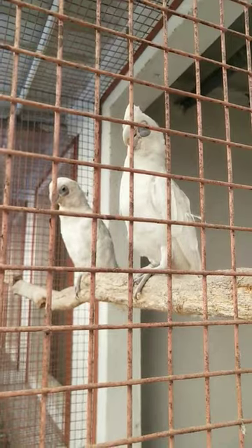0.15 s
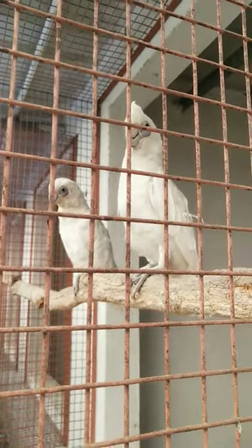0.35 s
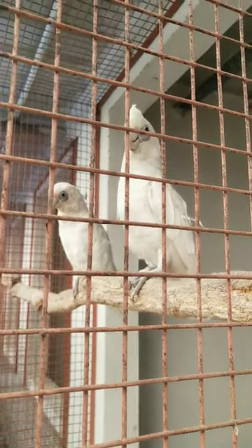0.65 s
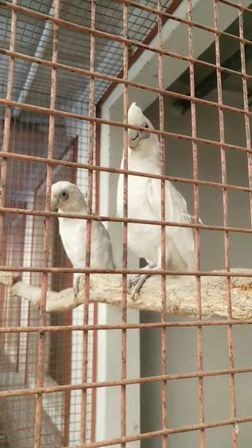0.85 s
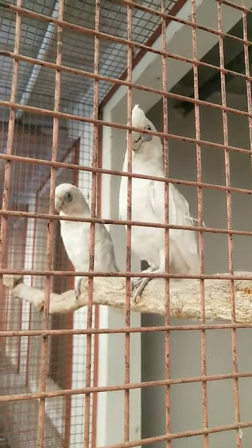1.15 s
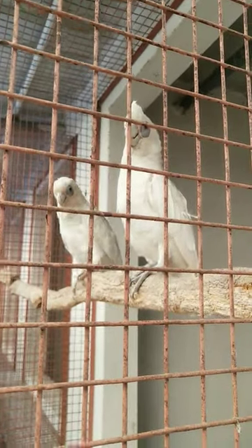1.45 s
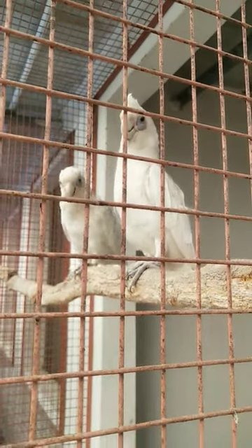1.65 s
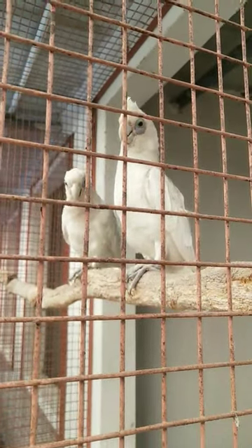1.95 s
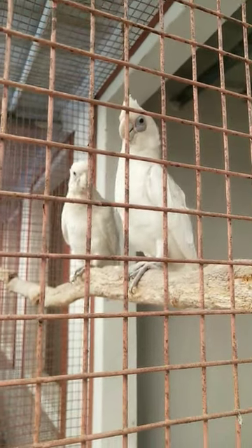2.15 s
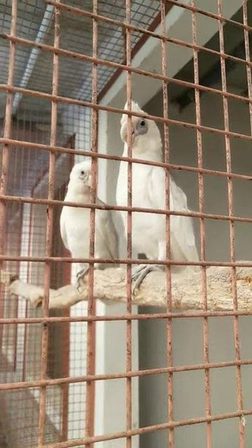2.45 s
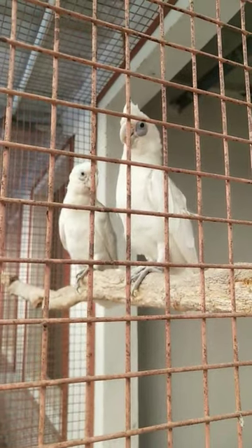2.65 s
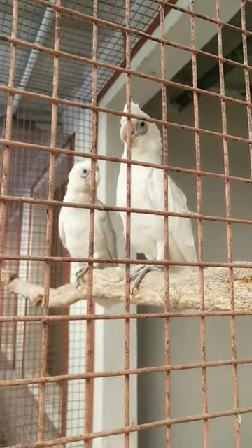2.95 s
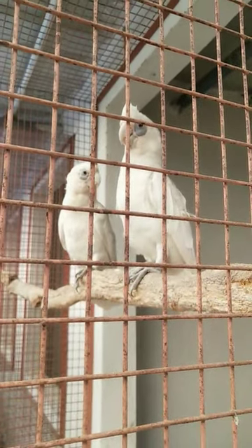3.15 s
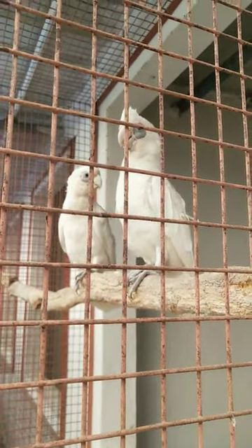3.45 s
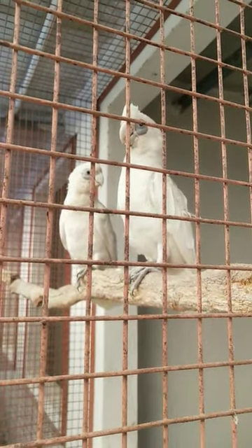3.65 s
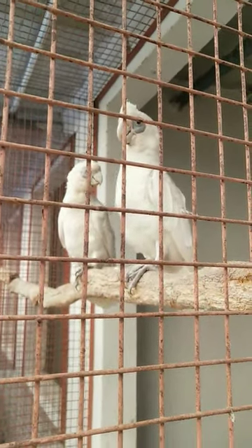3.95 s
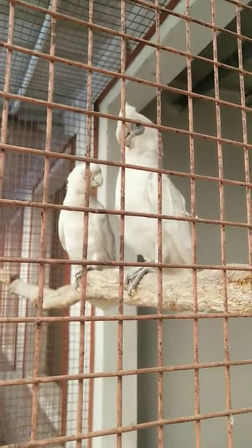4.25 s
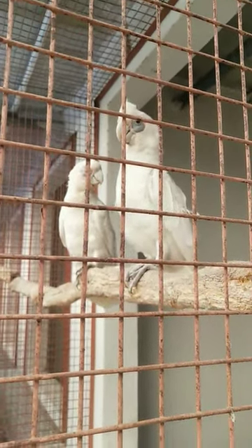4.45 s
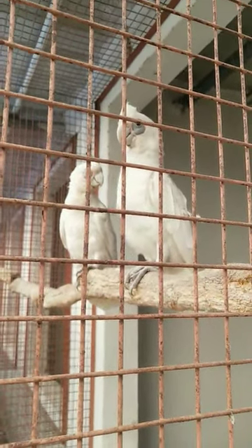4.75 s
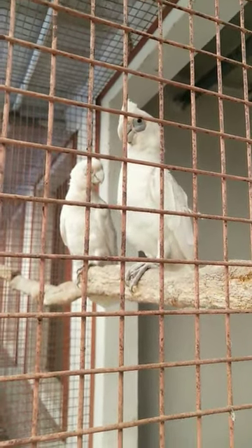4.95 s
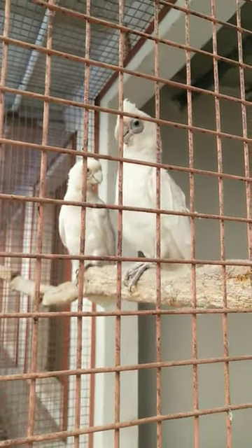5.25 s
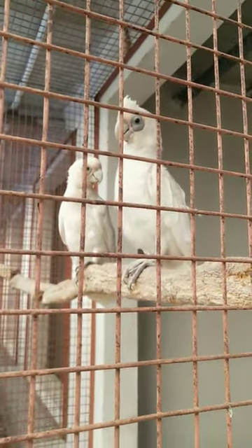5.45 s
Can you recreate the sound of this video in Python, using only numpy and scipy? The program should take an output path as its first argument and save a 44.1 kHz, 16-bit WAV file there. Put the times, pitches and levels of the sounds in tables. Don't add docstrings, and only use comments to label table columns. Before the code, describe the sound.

Parrots call in a hard, echoing aviary. Short rising whistles and harsh, raspy screeches alternate, the loudest screech just before two seconds. After a thinner middle, more whistles, low yelps and a long clear note follow. Small birds twitter high above. A sheet-metal door bangs softly five times with a late boom. Far chatter, rumble and hiss lie behind, heard in stereo by a small microphone, mostly as reverberation.

```python
import sys
import numpy as np
from scipy import signal
from scipy.fft import rfft, irfft, next_fast_len
from scipy.io import wavfile

SR = 44100
rng = np.random.default_rng(int(sys.argv[2]) if len(sys.argv) > 2 else 0)


def output_pcm(signal):
    pcm = np.clip(np.atleast_2d(signal).T, -1, 1) * 32767
    wavfile.write(sys.argv[1], SR, np.round(pcm).astype(np.int16))


def level_to_linear(level):
    exponent = np.asarray(level, float) / 20
    return 10 ** exponent


N = 246519


def at_hz(points, hz):
    table_hz, value = np.transpose(points)
    return np.interp(np.log(hz), np.log(table_hz), value)


def rms_one(x):
    return x / np.sqrt(np.mean(x ** 2) + 1e-20)


def drift(rate_hz):
    pole = np.exp(-2 * np.pi * rate_hz * 20 / SR)
    noise = rng.standard_normal(N // 20 + 2002)
    slow = signal.lfilter([1], [1, -2 * pole, pole * pole], noise)[2000:]
    return np.interp(np.arange(N) / 20, np.arange(len(slow)), rms_one(slow))


# frequency in Hz, left-right likeness from 0 to 1.
PORT_LIKENESS = [(30, 0.65), (130, 1), (290, 0.78), (640, 0.58), (1400, 0.053), (5000, 0.084),
                 (15000, 0.029)]
# frequency in Hz, left minus right in dB.
PORT_LEANING = [(60, 1), (300, 1.5), (600, 0.5), (1500, 5), (2800, 7), (5000, 2), (9000, 16), (14000, 4)]


def stereo_bands(gain, size):
    out = 0
    edges = 25 * 2 ** (np.arange(30) / 3)
    white = rng.standard_normal((2, 2, size))
    left_right = np.array([[1], [-1]])
    for k, (low, high) in enumerate(zip(edges, edges[1:])):
        band = signal.butter(2, [low, high], "band", fs=SR, output="sos")
        mid, side = signal.sosfilt(band, white[k % 2])
        hz = np.sqrt(low * high)
        alike = np.clip(at_hz(PORT_LIKENESS, hz), -1, 1)
        pair = np.sqrt(1 + alike) * mid + np.sqrt(1 - alike) * side * left_right
        out = out + gain(hz) * pair * level_to_linear(at_hz(PORT_LEANING, hz) / 2 * left_right)
    return out


# frequency in Hz, time to fall by 60 dB in seconds.
HALL_T60 = [(60, 2.44), (500, 1.61), (1000, 0.93), (3000, 1.49), (6000, 1.11), (14000, 0.058)]


def hall(x, build_s, early_db, t60_share, colour=lambda hz: 0, damping=0):
    t = np.arange(3 * SR // 2) / SR
    swell = 1 - np.exp(-t / build_s) + level_to_linear(early_db) * np.exp(-t / 0.025)

    def decay(hz):
        t60_s = t60_share * at_hz(HALL_T60, hz) / (1 + damping * hz / 4000)
        return swell * level_to_linear(colour(hz) - 60 * t / t60_s)

    echoes = stereo_bands(decay, size=len(t))
    echoes = echoes / np.sqrt(np.sum(echoes ** 2) / 2)
    size = next_fast_len(N + len(t))
    return irfft(rfft(echoes, size) * rfft(x, size), size)[:, :N]


# start in seconds, level in dB.
CHATTER_LEVEL = [(0, -38), (.3, -40.5), (.7, -39.5), (1.0, -44), (1.399, -36.5), (1.8, -42), (2.2, -38),
                 (2.5, -39), (2.8, -42), (3.2, -45.5), (3.6, -55.5), (3.9, -45), (4.3, -37.5), (5.0, -42.5),
                 (5.59, -36.5)]
# start in seconds, level in dB.
RUMBLE_LEVEL = [(0, -37.5), (.4, -46.5), (1.1, -40), (1.6, -45), (2.7, -48.5), (3.2, -43.5), (3.6, -42.5),
                (4.0, -39.5), (5.0, -45), (5.59, -47.5)]
# frequency in Hz, density in dB per Hz.
BACKGROUND_COLOUR = [(15, -45), (25, -7.5), (136, 3.5), (468, -4), (845, -1.5), (1260, -7.5), (2110, -0.5),
                     (3070, -1.5), (3810, 0), (6180, -3), (8300, -18), (10600, -70), (14200, -34),
                     (15400, -60)]


def chatter():
    t = np.arange(N) / SR
    birds_db = np.interp(t, *np.transpose(CHATTER_LEVEL))
    rumble_db = np.interp(t, *np.transpose(RUMBLE_LEVEL))
    hiss_db = -30.5 + 0.27 * (birds_db - birds_db.mean())
    deep_db = rumble_db.mean() + 0.58 * (rumble_db - rumble_db.mean())
    patchy_db = 0.98 * drift(6.6)

    def gain(hz):
        if hz < 170:
            own_db = deep_db
        elif hz < 1500:
            own_db = rumble_db
        elif hz > 9500:
            own_db = hiss_db
        else:
            own_db = birds_db
        return level_to_linear(at_hz(BACKGROUND_COLOUR, hz) + own_db + patchy_db + 2.3 * drift(18))

    return level_to_linear(3.0) * stereo_bands(gain, size=N)


# start in seconds, level in dB.
TICKS = [
    (2.9, -90),
    (3.117, -63),
    (3.775, -57),
    (4.4, -44),
]


def wire():
    clicks = np.zeros(N)
    for s, level_db in TICKS:
        clicks[round(s * SR)] = level_to_linear(level_db + 29)
    bright = signal.butter(4, 9000, "high", fs=SR, output="sos")
    return signal.sosfilt(bright, clicks + 1e-18)


# start in seconds, level in dB, brightness in dB.
BANGS = [
    (.388, -36.5, -5.5),
    (1.017, -32.5, -8),
    (3.363, -35, -10.5),
    (4.095, -37, -7),
    (4.762, -34.5, -12),
]
# frequency in Hz, density in dB per Hz.
SHEET_COLOUR = [(40, -43), (145, -15.5), (440, -9), (800, -1.5), (1500, -3.5), (2400, -3), (3500, -12.5),
                (7000, -6), (9000, -27), (12000, -16), (15300, -6)]


def door():
    rattle, boom = np.zeros(N), np.zeros(N)
    t = np.arange(SR // 2) / SR
    burst = level_to_linear(-39.0) * rng.standard_normal((len(BANGS), len(t))) * np.exp(-t / 0.025)
    burst[:, 0] = 1
    panel = (1 - np.exp(-t / 0.044)) ** 2 * np.exp(-t / 0.069) * np.sin(2 * np.pi * 152 * t)
    for (s, level_db, bright_db), hit in zip(BANGS, burst):
        dull = signal.lfilter([.3], [1, -.7], hit)
        start = round(s * SR)
        at = slice(start, start + len(t))
        rattle[at] += level_to_linear(level_db + 42) * (dull + level_to_linear(bright_db) * (hit - dull))
        boom[at] += level_to_linear(level_db + 2.5) * panel
    spread = hall(rattle, build_s=0.032, early_db=-12.5, t60_share=1.16, damping=0.66,
                  colour=lambda hz: at_hz(SHEET_COLOUR, hz))
    return spread + boom * level_to_linear([[1.1], [-1.1]])


def coloured(spectrum, level_db):
    hz = np.maximum(np.arange(N // 2 + 1) * SR / N, 1)
    shaped = rfft(rng.standard_normal(N)) * level_to_linear(at_hz(spectrum, hz))
    return level_to_linear(level_db) * rms_one(irfft(shaped, N))


# frequency in Hz, density in dB per Hz.
THROAT_COLOUR = [(1300, -61), (1900, -16.5), (3000, -10), (4300, 8.5), (5000, -20), (6200, -12.5),
                 (8000, -6.5), (8800, -21), (15400, -27)]


def throat_rasp(level_db):
    return coloured(THROAT_COLOUR, level_db)


def breath(level_db):
    # frequency in Hz, density in dB per Hz.
    breathy = [(1500, -41), (2200, -0.5), (3200, 4.5), (3800, -5), (7000, -9.5), (12000, -39)]
    return coloured(breathy, level_db)




def voice(calls, manner, orders, wobble, wobble_hz, sag, flutter_db, rasp):
    t, out = np.arange(N) / SR, np.zeros(N)
    glide_s, swell, swell_db, fade_db, off_db = manner
    unsteady = 1 + wobble * drift(wobble_hz) - sag * np.minimum(drift(wobble_hz / 3) ** 2, 3)
    flutter = level_to_linear(flutter_db * drift(86))
    peak = np.clip(swell, .02, .98)
    for start, length, open_hz, held_hz, level_db in calls:
        on = slice(max(int(start * SR), 0), min(int((start + length) * SR), N))
        done = (t[on] - start) / length
        to_glide = np.maximum(1 - done * length / glide_s, 0)
        hz = held_hz + (open_hz - held_hz) * to_glide ** 2
        phase = 2 * np.pi * np.cumsum(hz * unsteady[on]) / SR
        edge = np.clip(np.minimum(done, 1 - done) * length * 50, 0, 1)
        effort_db = level_db - np.interp(done, [0, peak, 1], [swell_db, 0, fade_db])
        effort_db = effort_db - off_db * np.abs(np.log2(hz / held_hz))
        tone = np.sqrt(2) * sum(level_to_linear(db) * np.sin(k * phase) for k, db in orders)
        air = rasp[on] * (1 + np.cos(phase / 2))
        out[on] += edge * level_to_linear(effort_db) * (tone + air)
    return out * flutter


CHIRPS = [ (-.06, 0.26, 4300, 4160, -39), (-.05, 0.18, 6330, 6220, -43), (.002, .08, 7000, 7140, -41),
          (.272, 0.22, 7170, 6325, -39.5), (1.082, .28, 7200, 7450, -46), (2.552, 0.23, 6330, 6940, -46),
          (2.722, 0.064, 5070, 4250, -38), (2.802, 0.15, 6520, 6850, -41.5), (2.992, .04, 7500, 7550, -50),
          (3.032, .15, 6360, 6140, -44.5), (4.205, 0.13, 6700, 7000, -43), (4.295, 0.28, 4200, 4310, -46),
          (4.375, 0.052, 5660, 6500, -41.5), (4.625, 0.1, 6040, 6750, -46), (4.785, .155, 7570, 6950, -50),
          (5.15, 0.16, 5060, 4930, -38), (5.21, 0.18, 5830, 6840, -38.5), (5.245, 0.23, 4300, 4060, -40),
          (5.405, 0.27, 6620, 6550, -50), (5.475, 0.17, 1226, 1345, -49.5)]
TWITTER_MANNER = (.1, 0.23, 1.7, 8.0, 1.5)


def twitters():
    return voice(CHIRPS, TWITTER_MANNER, [(0.97, 0.016)], wobble=0.03394, wobble_hz=129.0,
                 sag=0.00498, flutter_db=5.5, rasp=throat_rasp(-12.5))


NOTES = [
    (.31, 0.15, 2997, 2965, -39.5),
    (.46, 0.095, 2990, 3063, -40.5),
    (1.46, 0.15, 2882, 2912, -40.5),
    (3.7, 0.036, 3490, 3570, -43),
    (3.93, 0.113, 1964, 1984, -38.5),
    (4.615, .23, 2368, 2360, -30.5),
    (4.92, 0.097, 2360, 2360, -39),
]
NOTE_ORDERS = [(1, 6), (2, -31)]
NOTE_MANNER = (0.084, 0.61, 9.7, 6.8, 3.0)


def clear_notes():
    return voice(NOTES, NOTE_MANNER, NOTE_ORDERS, wobble=0.0068, wobble_hz=41.7,
                 sag=0.00093, flutter_db=3.0, rasp=breath(-43))


YELPS = [
    (2.46, .11, 680, 950, -43),
    (2.495, 0.07, 1706, 1800, -38),
    (3.92, .14, 932, 1235, -39.5),
    (4.07, 0.082, 1528, 1045, -33.5),
    (4.14, .28, 1052, 992, -45.5),
    (4.23, 0.137, 1789, 1752, -40.5),
    (4.535, 0.042, 5260, 5060, -33.5),
]
YELP_ORDERS = [(1, 5), (2, -20)]
YELP_MANNER = (.12, 0.34, 3.3, 4.2, 2.3)


def yelps():
    return voice(YELPS, YELP_MANNER, YELP_ORDERS, wobble=0.0506, wobble_hz=45.0,
                 sag=0.0052, flutter_db=4.5, rasp=breath(-20))


WHISTLES = [ (-.05, 0.43, 3150, 3220, -47.5), (.14, 0.26, 2483, 2756, -42), (.25, 0.21, 2150, 3000, -35),
            (.36, 0.18, 2503, 2610, -37.5), (.44, 0.14, 2700, 3250, -33.5), (1.17, 0.16, 3050, 3090, -46),
            (1.41, 0.17, 2300, 3100, -33.5), (1.89, 0.16, 2890, 3156, -36), (2.22, 0.11, 2450, 3100, -37),
            (2.36, 0.061, 2750, 2680, -34), (3.05, 0.095, 3200, 3200, -49), (3.16, .08, 2900, 3600, -48),
            (3.385, 0.15, 2000, 3250, -32.5), (3.54, 0.088, 2600, 3150, -32),
            (3.66, 0.29, 2600, 2550, -45.5), (3.76, .16, 2500, 3233, -47.5), (4.18, 0.24, 2500, 3040, -34),
            (4.52, .33, 1900, 3330, -30.5), (5.1, 0.32, 2100, 3022, -31.5), (5.15, 0.19, 3004, 3564, -32.5)]
WHISTLE_ORDERS = [(1, 4), (2, -36)]
WHISTLE_MANNER = (.105, .35, 2.0, 9.0, 20.0)


def whistles():
    return voice(WHISTLES, WHISTLE_MANNER, WHISTLE_ORDERS, wobble=0.0146, wobble_hz=122.1,
                 sag=.04, flutter_db=2.0, rasp=breath(-18.0))


SCREECHES = [
    (.485, .2, 1980, 2036, -31),
    (.795, 0.19, 2052, 2000, -33.5),
    (1.12, 0.26, 1974, 2031, -32),
    (1.41, 0.28, 1988, 2056, -29.5),
    (1.885, 0.28, 2053, 2093, -24.5),
    (2.335, 0.203, 2067, 2127, -29),
    (2.74, .06, 2093, 2110, -43),
    (3.9, 0.18, 1605, 1996, -32),
    (4.765, 0.12, 2213, 2164, -34.5),
]
SCREECH_ORDERS = [(1, -3.5), (1.3, -19), (1.499, -19), (2, 1), (2.498, -37), (3, -1), (3.601, -10.5),
                  (3.899, -16.5), (5.002, -25.5)]
SCREECH_MANNER = (.03, 0.49, 1.8, 14.6, 3.0)


def screeches():
    return voice(SCREECHES, SCREECH_MANNER, SCREECH_ORDERS, wobble=0.0337, wobble_hz=131.2,
                 sag=0.00535, flutter_db=2.5, rasp=throat_rasp(-7.5))


def parrots():
    screech, whistle, yelp = screeches(), whistles(), yelps()
    near_calls = level_to_linear(-3.5) * screech + level_to_linear(-9.5) * yelp + twitters() + wire()
    near = hall(near_calls, build_s=0.015, early_db=6, t60_share=0.92)
    far = hall(whistle + clear_notes(), build_s=0.037, early_db=6.5, t60_share=0.84)
    direct = level_to_linear(-7.0) * yelp + level_to_linear(-14.0) * screech + level_to_linear(-15.0) * whistle
    return near + far + level_to_linear([[3.0], [-3.0]]) * direct


def scene():
    return chatter() + door() + parrots()


def roll_off(x):
    return signal.sosfilt(signal.butter(12, 15520, fs=SR, output="sos"), x)


def record(dry):
    top_cut = signal.cheby2(16, 60, 16000, fs=SR, output="sos")
    bass_cut = signal.butter(2, 40, "high", fs=SR, output="sos")
    mix = signal.sosfilt(bass_cut, signal.sosfilt(top_cut, dry))
    return roll_off(mix)


dry = scene()
out = record(dry)
output_pcm(out)
```